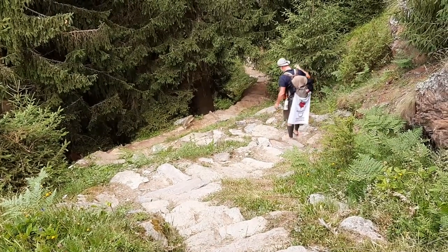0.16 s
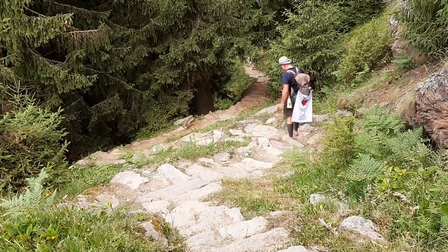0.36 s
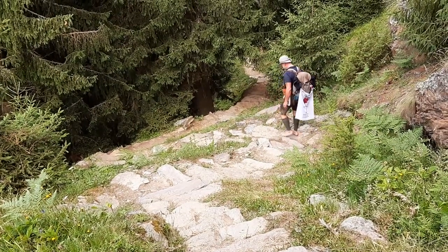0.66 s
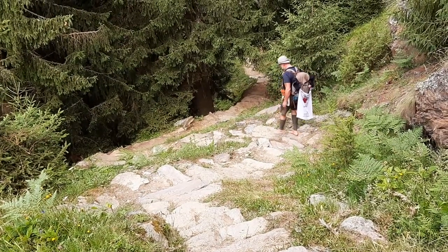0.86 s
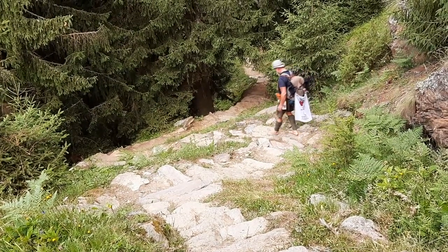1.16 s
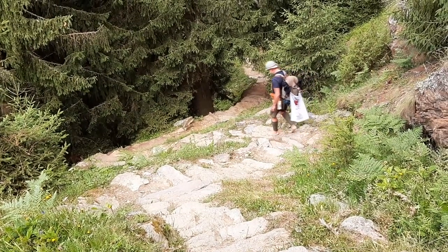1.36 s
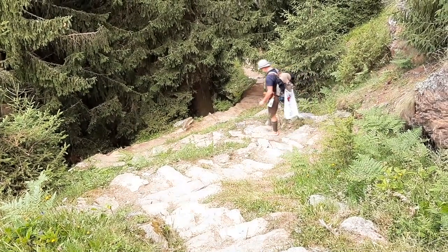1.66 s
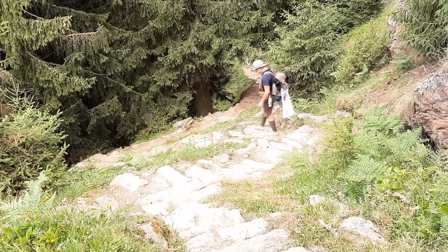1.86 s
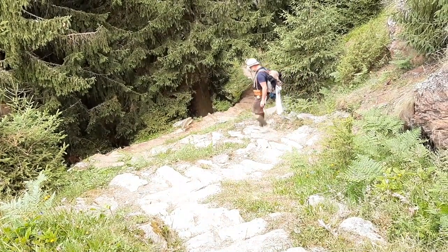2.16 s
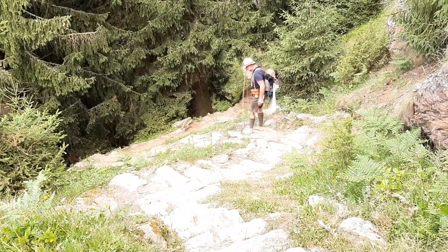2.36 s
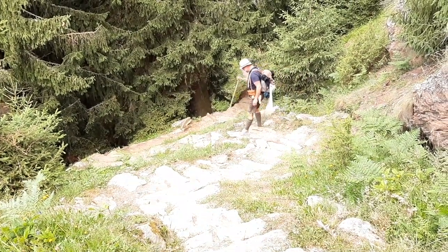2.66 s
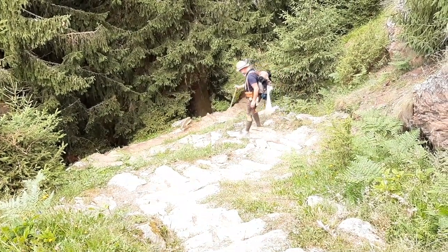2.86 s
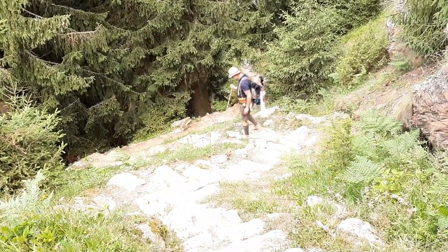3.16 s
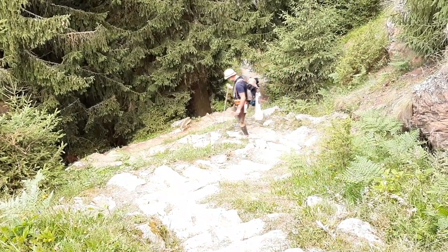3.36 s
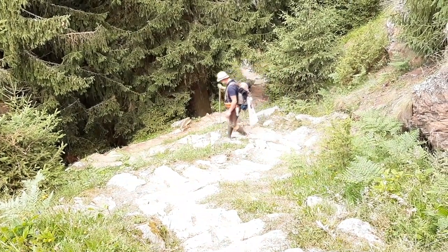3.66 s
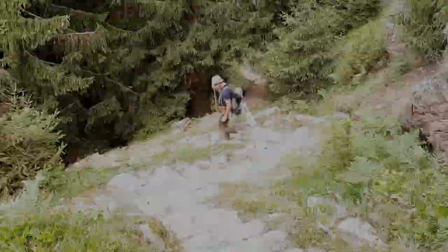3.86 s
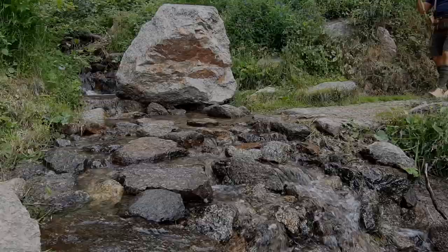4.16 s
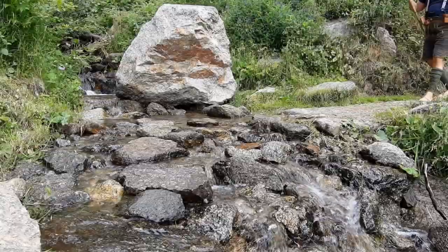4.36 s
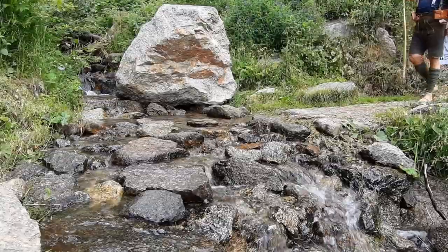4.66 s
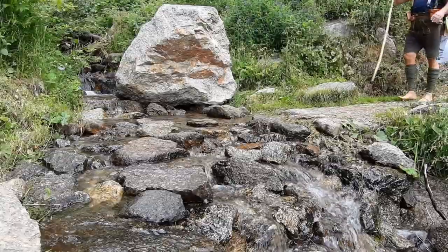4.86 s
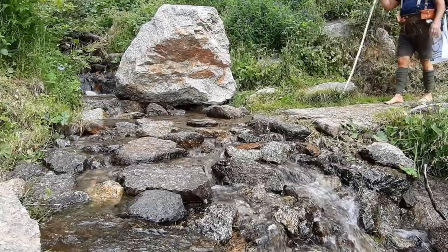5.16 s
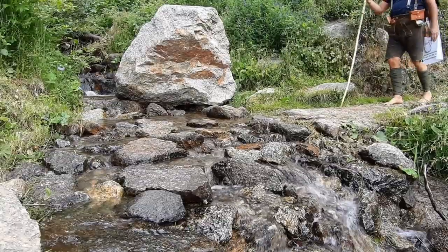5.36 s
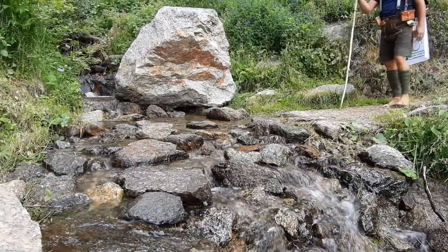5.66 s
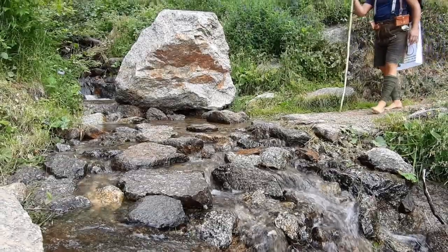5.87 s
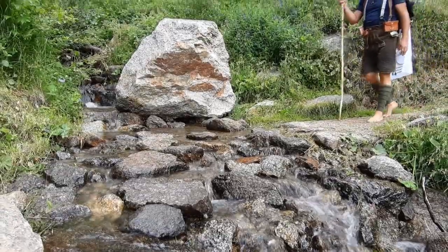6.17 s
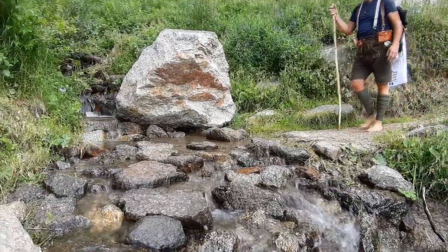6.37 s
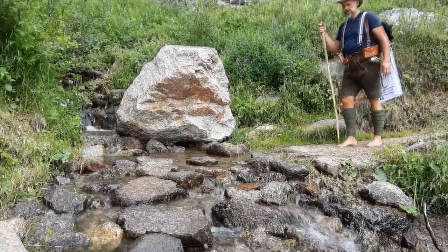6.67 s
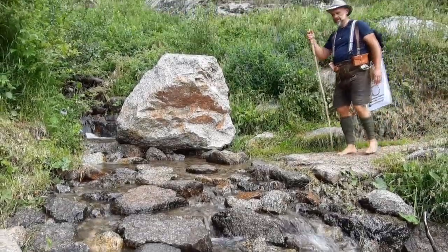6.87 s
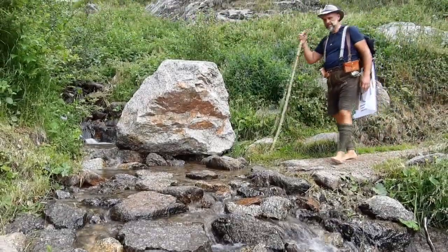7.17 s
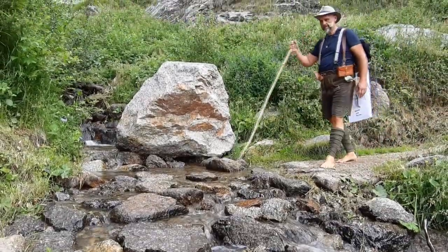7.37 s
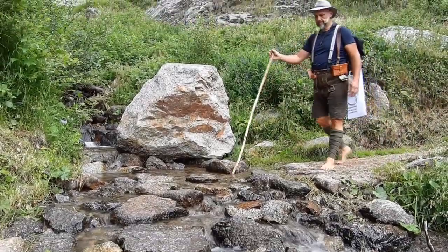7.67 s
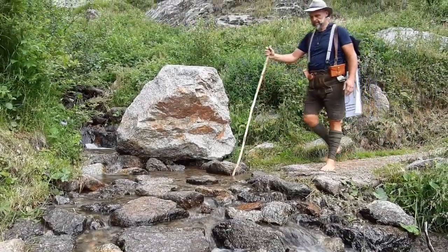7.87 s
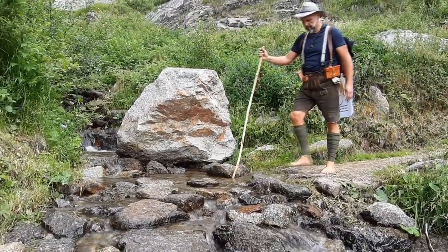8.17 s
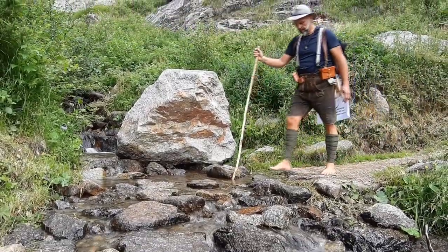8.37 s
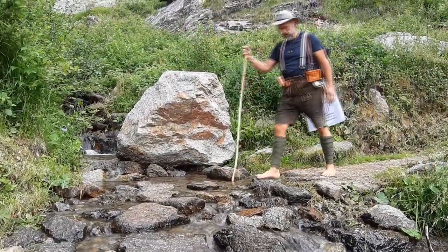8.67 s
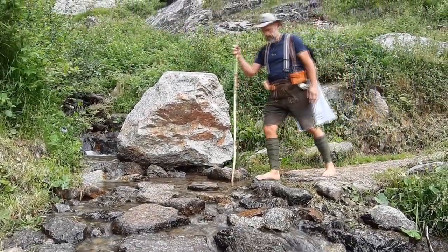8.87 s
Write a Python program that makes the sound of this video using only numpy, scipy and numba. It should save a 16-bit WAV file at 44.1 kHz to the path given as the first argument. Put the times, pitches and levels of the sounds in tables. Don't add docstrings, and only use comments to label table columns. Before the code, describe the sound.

Four seconds of near-silent forest: faint high chirps, quick falling bird sweeps with little trills, and distant calls echoing among trees. A walking stick clicks once on stone near three seconds. After a blink of silence, a loud rocky stream bursts in close by, bubbling, splashing and hissing, brightest in its first second, then steadier to the end.

```python
import sys
import numpy as np
from scipy import signal
from scipy.fft import rfft, irfft, next_fast_len
from scipy.io import wavfile
from numba import njit

SR = 44100
rng = np.random.default_rng(int(sys.argv[2]) if len(sys.argv) > 2 else 0)


def bounce(signal):
    frames = np.transpose(np.atleast_2d(signal))
    limited = np.clip(frames, -1, 1)
    pcm = np.round(limited * 32767).astype(np.int16)
    wavfile.write(sys.argv[1], SR, pcm)


def invert_db(x):
    u = np.asarray(x, float) / 20
    return 10 ** u


N = 397341
TIME = np.arange(N) / SR
FOREST_ENDS_S, STREAM_STARTS_S = 4.049, 4.1095
STREAM_SIZE = N - round(STREAM_STARTS_S * SR)
TOP_HZ = 15800


def rms_one(x):
    return x / np.sqrt(np.mean(x ** 2) + 1e-20)


def at_hz(points, hz):
    table_hz, value = np.array(points).T
    return np.interp(np.log(hz), np.log(table_hz), value)


def panned(x, pan_db):
    return np.array([x * invert_db(pan_db / 2), x * invert_db(-pan_db / 2)])


def drift(rate, size):
    r = np.exp(-40 * np.pi * rate / SR)
    noise = rng.standard_normal(size // 20 + 2002)
    slow = signal.lfilter([1], [1, -2 * r, r * r], noise)[2000:]
    return np.interp(np.arange(size) / 20, np.arange(len(slow)), rms_one(slow))


def banded_noise(spectrum, likeness, lean, size, gain_db):
    length = next_fast_len(size)
    hz = np.maximum(np.arange(length // 2 + 1) * SR / length, 1)
    mid, side = rfft(rng.standard_normal((2, length))) * invert_db(at_hz(spectrum, hz))
    alike = np.clip(at_hz(likeness, hz), -1, 1)
    both = np.sqrt(1 + alike) * mid + np.sqrt(1 - alike) * side * [[1], [-1]]
    both = both * panned(1, at_hz(lean, hz))
    out = 0
    for step in range(-4, 17):
        centre_hz = 300 * 2 ** (step * .375)
        away = np.log2(hz / centre_hz) / .375
        lowest = 0 if step == -4 else -1
        share = np.cos(np.pi / 2 * np.clip(away, lowest, 1)) ** 2
        out = out + invert_db(gain_db(centre_hz)) * irfft(both * share, length)[:, :size]
    return rms_one(out)


# hz, level_db [dB per Hz]
FOREST_SPECTRUM = [(15, -50), (25, -15), (49, -2.5), (123, -0.5), (195, -9), (439, -16), (575, -17),
                   (734, -17.5), (1070, -19.5), (2110, -20.5), (5000, -22.5), (12200, -25.5), (16000, -21)]
# hz, correlation [-1..1]
FOREST_LIKENESS = [(60, 0.58), (180, 0.69), (550, 0.32), (1650, -0.083), (4970, -0.093), (15000, 0.04)]
# hz, lean_db
FOREST_LEAN_DB = [(60, -1.5), (380, -1.5), (2380, -3.5), (15000, -0.5)]


def forest_air():
    size = N // 2
    noise = banded_noise(FOREST_SPECTRUM, FOREST_LIKENESS, FOREST_LEAN_DB, size,
                         lambda hz: 0.28 * drift(3.1, size))
    return invert_db(-63.5) * noise


def glides(notes, bend):
    return [(start_s, length_s, start_hz, start_hz + bend * (end_hz - start_hz), end_hz, peak_db)
            for start_s, length_s, start_hz, end_hz, peak_db in notes]


def whistle(notes, flutter_db, waver, hook):
    out = np.zeros(N)
    flutter = invert_db(flutter_db * drift(85, N))
    wobble = 1 + waver * drift(173, N)
    for start_s, length_s, start_hz, middle_hz, end_hz, peak_db in notes:
        u = np.linspace(0, 1, round(length_s * SR))
        at = round(start_s * SR)
        span = slice(at, at + len(u))
        curve = np.polyfit([0, .5, 1], [start_hz, middle_hz, end_hz], 2)
        hz = np.polyval(curve, u ** hook) * wobble[span]
        shape = np.sin(np.pi * u ** 1.3) ** .9
        out[span] += invert_db(peak_db) * shape * np.sin(2 * np.pi * np.cumsum(hz) / SR)
    return out * flutter


# start_s, length_s, peak_db
HIGH_NOTES = [
    (.372, 0.035, -64),
    (0.464, 0.045, -61),
    (0.576, 0.052, -64.5),
    (0.698, 0.047, -64),
    (0.801, 0.072, -67),
    (0.907, 0.072, -63),
]


def high_bird():
    start_hz, end_hz, sag_hz_per_s = 7850, 6260, 550
    run = [(start_s, length_s, start_hz - sag_hz_per_s * start_s, end_hz - sag_hz_per_s * start_s, peak_db)
           for start_s, length_s, peak_db in HIGH_NOTES]
    return whistle(glides(run, bend=0.31), flutter_db=3.0, waver=.009, hook=2.3)


# start_s, peak_db, pan_db, bright_db_per_octave
STICK_TICKS = [
    (.4758, -73, -6, -18),
    (2.911, -54, -5, -2),
    (2.914, -58, -3, -6),
    (2.919, -55, -3, -3),
    (2.9234, -38.5, -7, 3),
    (2.9282, -48, -4, -5),
    (2.932, -55, -4, -7),
    (3.829, -70, -3.5, 3),
    (3.864, -67, -2.5, 6),
]
# hz, level_db, t60_s
STONE_MODES = [(950, -26, 0.008), (1410, -17, 0.022), (1940, -19, 0.015), (2470, -12, 0.014),
               (3120, -2, 0.011), (3670, -8, 0.012), (4300, -0.5, 0.012), (5240, -17, 0.0065),
               (6070, -22, .004)]


def stick():
    contact_s = 0.00072
    out = np.zeros((2, N))
    start_s, peak_db, pan_db, bright_db = np.transpose(STICK_TICKS)
    draw = rng.standard_normal((len(start_s), len(STONE_MODES)))
    for k, (hz, level_db, t60_s) in enumerate(STONE_MODES):
        clicks = np.full((2, N), 1e-18)
        strength_db = peak_db + level_db + bright_db * np.log2(hz / 4000) + 2.5 + 2.7 * draw[:, k]
        clicks[:, (start_s * SR).astype(int)] = panned(invert_db(strength_db), pan_db)
        late = np.roll(clicks, round(contact_s * SR * abs(draw[0, k])), axis=1)
        r, w = invert_db(-60 / (t60_s * SR)), 2 * np.pi * hz / SR
        out += (-1) ** k * signal.lfilter([0, np.sin(w)], [1, -2 * r * np.cos(w), r * r], late)
    return signal.sosfilt(signal.butter(3, [1000, 6000], "band", fs=SR, output="sos"), out)


# start_s, length_s, start_hz, end_hz, peak_db
DEEP_NOTES = [
    (.505, 0.065, 3640, 4300, -64),
    (1.14, 0.085, 6520, 6700, -69),
    (1.2, .3, 5000, 4950, -78),
    (1.78, 0.17, 4950, 4900, -75),
    (2.1, .2, 4600, 4830, -74),
    (2.48, 0.12, 4930, 4630, -77),
    (2.95, .22, 3000, 4490, -71),
]


def deep_birds():
    return whistle(glides(DEEP_NOTES, bend=.82), flutter_db=3.0, waver=.03, hook=1.05)


# start_s, length_s, start_hz, end_hz, peak_db
FAR_NOTES = [
    (1.05, .055, 7100, 6400, -56),
    (1.62, 0.087, 5040, 4850, -60),
    (2.06, 0.057, 6210, 6150, -62),
    (2.99, 0.091, 8350, 7850, -66),
    (3.16, .135, 7900, 6900, -58.5),
    (3.915, .081, 7400, 6300, -65),
    (4.03, .03, 7380, 7240, -64),
]


def far_birds():
    return whistle(glides(FAR_NOTES, bend=.3), flutter_db=2.5, waver=.004, hook=1)


# start_s, length_s, start_hz, end_hz, peak_db
SWEEP_NOTES = [
    (1.066, 0.035, 6750, 5040, -54.5),
    (1.549, 0.047, 6250, 4300, -54),
    (2.064, .039, 6000, 3300, -55.5),
]


def near_sweeps():
    return whistle(glides(SWEEP_NOTES, bend=.28), flutter_db=2.5, waver=.012, hook=1.2)


# start_s, peak_db
TRILL_PHRASES = [
    (1.152, -55.5),
    (1.646, -56.5),
    (2.151, -57.5),
]
# after_s, length_s, top_hz, level_db
TRILL_PATTERN = [
    (0, 0.019, 3780, -4),
    (0.051, 0.0177, 3840, -1),
    (0.102, .022, 3850, 1.5),
    (.16, .025, 3750, 1),
    (0.23, 0.037, 3580, -3),
]


def near_trills():
    notes = [(start_s + after_s, length_s, .86 * top_hz, top_hz, 0.98 * top_hz, peak_db + level_db)
             for start_s, peak_db in TRILL_PHRASES
             for after_s, length_s, top_hz, level_db in TRILL_PATTERN]
    return whistle(notes[:-2], flutter_db=1, waver=.02, hook=1)


def trees(x, t60_s, late_db, echo_s, echo_db):
    t = np.arange(SR // 2) / SR
    fall = invert_db(-60 * t / t60_s) + invert_db(late_db - 60 * t / (4 * t60_s))
    patchy = invert_db(3.0 * drift(150, len(t)))
    scatter = rng.standard_normal((2, len(t))) * patchy * fall * np.clip(t / .012, 0, 1)
    scatter /= np.sqrt(np.sum(scatter ** 2, axis=1, keepdims=True))
    scatter[:, round(echo_s * SR)] += invert_db(echo_db)
    return signal.fftconvolve(x[None], scatter, axes=1)[:, :N]


def forest():
    air, high, ticks, deep = forest_air(), high_bird(), stick(), deep_birds()
    far, sweeps, trills = far_birds(), near_sweeps(), near_trills()
    direct = panned(high, -2.0) + panned(sweeps + trills, -12.0) + panned(far + deep, 1.5) + ticks
    sent = invert_db(7.5) * high + invert_db(-12.0) * ticks.mean(axis=0) + deep
    sent += invert_db(-4.0) * far + invert_db(2.5) * sweeps + invert_db(-2.5) * trills
    wet = trees(sent, t60_s=.22, late_db=-12.0, echo_s=.025, echo_db=-8.0)
    out = direct + wet * panned(1, np.array([-7.0]))
    out[:, :N // 2] += air
    return out * np.clip((FOREST_ENDS_S - TIME) / 0.0033, 0, 1)


# start_s, level_db
FACING = [
    (4.35, 2.2),
    (4.58, 2.5),
    (5.05, 3),
    (5.36, 0.4),
    (5.88, 0.5),
    (7.33, -0.06),
    (7.49, 0.6),
    (8.09, -0.2),
    (9.01, 0.7),
]


def facing_db(s):
    return np.interp(s, *np.transpose(FACING))


# hz, share
FACING_SHARE = [(600, 0.59), (2000, 0.48), (4500, 1.94), (9000, 0.94)]


def flow_db(s, hz):
    return facing_db(s) * at_hz(FACING_SHARE, hz)


# hz, level_db [dB per Hz]
STREAM_SPECTRUM = [(29, -62), (50, -33), (163, -6.5), (277, -1), (532, -5), (884, -3), (1150, -4.5),
                   (1470, -4), (1820, -6), (2270, -3.5), (2880, -6), (7210, -15.5), (8540, -26),
                   (12000, -25), (16000, -31.5)]
# hz, correlation [-1..1]
STREAM_LIKENESS = [(60, 0.88), (150, 0.99), (380, 0.95), (950, 0.71), (2380, 0.35), (5980, -0.47),
                   (15000, 0.19)]
# hz, lean_db
STREAM_LEAN_DB = [(60, -0.5), (240, -1.5), (950, -2.5), (3770, -2.5), (15000, 4)]


def roar():
    s, surge = TIME[-STREAM_SIZE:], drift(4.0, STREAM_SIZE)
    return banded_noise(STREAM_SPECTRUM, STREAM_LIKENESS, STREAM_LEAN_DB, STREAM_SIZE,
                        lambda hz: flow_db(s, hz) + 0.37 * surge + 2.6 * drift(30, STREAM_SIZE))


@njit
def add(out, start, hz, peak, cycles, rise, swell, pan, lag, sr):
    for k in range(len(start)):
        for ch in range(2):
            first = start[k] + (lag[k] if ch else 0.)
            gain = peak[k] * (1 / pan[k] if ch else pan[k])
            for i in range(int(first) + 1, min(int(first + cycles[k] * sr / hz[k]), out.shape[1])):
                turn = (i - first) * hz[k] / sr
                fade = np.exp(-6.9 * turn / cycles[k]) * (1 - np.exp(-turn / swell))
                out[ch, i] += gain * fade * np.sin(2 * np.pi * turn * (1 + rise[k] * turn / cycles[k]))


def swarm(count, low_hz, high_hz, cycles, spread_db, clump, clumps_per_s, swell, focus_db):
    draw, out = rng.random((count, 7)), np.zeros((2, STREAM_SIZE))
    busy = np.cumsum(np.exp(clump * np.clip(drift(clumps_per_s, STREAM_SIZE), -2, 2)))
    start = np.interp(draw[:, 0], busy / busy[-1], np.arange(STREAM_SIZE))
    hz = low_hz * (high_hz / low_hz) ** draw[:, 1]
    size_db = spread_db * np.minimum(-np.log(draw[:, 2] + 1e-9), 5)
    turn_db = flow_db(STREAM_STARTS_S + start / SR, hz)
    peak = hz * invert_db(size_db + at_hz(STREAM_SPECTRUM, hz) + turn_db)
    peak *= np.sign(draw[:, 6] - .5) * invert_db(focus_db * np.cos(2 * np.pi * hz / 721.0))
    across = 2 * draw[:, 4] - 1
    add(out, start, hz, peak, cycles * (.5 + draw[:, 3]), 0.21 * draw[:, 5], swell,
        invert_db(5.0 * across), 5.3 * across, SR)
    return rms_one(out)


def bubbles():
    return swarm(count=12000, low_hz=251.1, high_hz=2650, cycles=28, spread_db=2.2,
                 clump=.55, clumps_per_s=25, swell=1.3, focus_db=4.0)


def spray():
    return sum(swarm(count=16000, low_hz=low_hz, high_hz=1.73 * low_hz, cycles=20, spread_db=2.1,
                     clump=.42, clumps_per_s=14, swell=.5, focus_db=0) for low_hz in (3000, 5200, 9000))


def big_drops(events, count, octaves, cycles, swell, trim_db, pan_db):
    out = np.zeros((2, STREAM_SIZE))
    start_s, peak_db, hz = np.repeat(events, count, axis=0).T
    draw = rng.random((len(start_s), 5))
    follows = np.arange(len(start_s)) % count > 0
    start = (start_s - STREAM_STARTS_S + follows * 9.05 * draw[:, 2] / hz) * SR
    hz = np.minimum(hz * 2 ** (follows * octaves * (draw[:, 3] - .4)), TOP_HZ)
    peak = invert_db(peak_db + trim_db - 8.0 * follows)
    lean = invert_db(pan_db / 2 + 1.9 * (draw[:, 4] - .5))
    rise, lag = 0.063 + 0 * start_s, 23.0 * (draw[:, 1] - .5)
    add(out, start, hz, peak, cycles * (1.33 + 1.24 * draw[:, 0]), rise, swell, lean, lag, SR)
    return out


# start_s, peak_db, pitch_hz
SPIT_EVENTS = [(4.1108, -12.5, 12400), (4.4201, -15, 11100), (5.2358, -15, 9800), (5.297, -13, 11900),
               (5.6369, -17, 10500), (5.6663, -19, 7580), (5.9237, -12, 10800), (6.5902, -14, 10400),
               (6.8631, -26, 10300), (7.2731, -10.5, 10400), (8.2512, -13, 10000), (8.5672, -23, 10700)]


def spits():
    return big_drops(SPIT_EVENTS, count=6, octaves=1.1, cycles=24, swell=.6, trim_db=-4, pan_db=.8)


# start_s, peak_db, pitch_hz
PLOP_EVENTS = [(4.113, -13.5, 1440), (4.175, -13.5, 2080), (4.209, -14, 2360), (4.417, -13.5, 1440),
               (4.748, -12, 2040), (4.834, -8.5, 1930), (4.923, -8, 2080), (4.969, -10, 1390),
               (5.047, -11, 2060), (5.099, -11.5, 1490), (5.166, -19.5, 658), (5.2, -13, 1560),
               (5.281, -13, 1360), (5.6, -12, 1460), (5.886, -18.5, 874), (6.045, -17, 860),
               (6.205, -13, 1460), (6.575, -13.5, 910), (6.598, -10.5, 2080), (6.696, -11, 1510),
               (6.838, -16.5, 1370), (6.944, -9, 2050), (7.454, -15, 1600), (7.759, -12, 2310),
               (7.781, -14, 866), (7.908, -5.5, 1530), (8.406, -10.5, 1460), (8.453, -10, 2440),
               (8.468, -9.5, 2330), (8.974, -15.5, 830)]


def plops():
    return big_drops(PLOP_EVENTS, count=3, octaves=.8, cycles=13, swell=.8, trim_db=1.5, pan_db=-1.5)


# start_s, peak_db, pitch_hz
SPLAT_EVENTS = [(4.1866, -4.5, 5660), (4.3528, -15, 4300), (4.4227, -6, 4400), (4.4451, -7, 6800),
                (4.762, -6, 4500), (4.8053, -9, 7100), (4.8327, -3, 4100), (5.0586, -7, 5000),
                (5.1994, -7, 4740), (5.236, -5.5, 5000), (5.702, -7, 4400), (5.9258, -6, 4230),
                (6.24, -7, 5900), (6.5713, -7, 4150), (6.6301, -8, 4000), (7.3333, -4, 3860),
                (7.751, -7, 5570), (7.9187, -7, 4410), (8.275, -8, 5660), (8.3303, -8, 5970),
                (8.5049, -8, 6800), (8.6785, -9, 4000)]


def splats():
    return big_drops(SPLAT_EVENTS, count=5, octaves=1.6, cycles=16, swell=.9, trim_db=-8, pan_db=-1.5)


# start_s, peak_db, pitch_hz
GLUG_EVENTS = [(4.416, -24, 330), (5.116, -26, 352), (5.7, -21, 336), (5.889, -25, 395),
               (6.475, -22.5, 368), (6.855, -21.5, 265), (7.243, -19.5, 281), (7.497, -28, 285),
               (7.674, -21, 327), (7.783, -22, 283), (7.93, -28, 287), (8.458, -29, 268), (8.666, -20, 343)]


def glugs():
    return big_drops(GLUG_EVENTS, count=2, octaves=.5, cycles=14, swell=1.1, trim_db=1, pan_db=-2)


def stream():
    bed = invert_db(-29) * roar() + invert_db(-30.5) * bubbles() + invert_db(-40.5) * spray()
    pan_db = -0.36 * facing_db(TIME[-STREAM_SIZE:])
    drops = spits() + plops() + splats() + glugs()
    onset = np.minimum(np.arange(STREAM_SIZE) / 60, 1)
    out = np.zeros((2, N))
    out[:, -STREAM_SIZE:] = (bed * panned(1, pan_db) + drops) * onset
    return out


def scene():
    return forest() + stream()


def band_limit(x):
    return signal.sosfilt(signal.butter(12, 16760, fs=SR, output="sos"), x)


def record(dry):
    dry = signal.sosfilt(signal.butter(2, 45, "high", fs=SR, output="sos"), dry)
    dry = signal.sosfilt(signal.ellip(10, .3, 80, TOP_HZ, fs=SR, output="sos"), dry)
    return band_limit(dry)


dry = scene()
out = record(dry)
bounce(out)
```